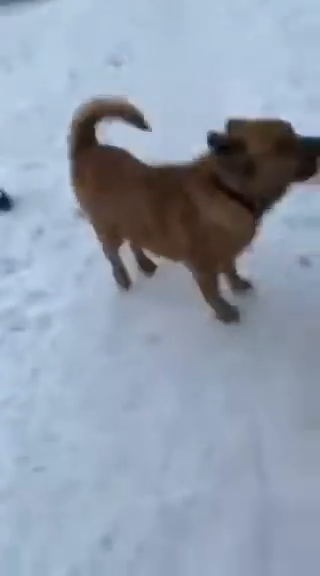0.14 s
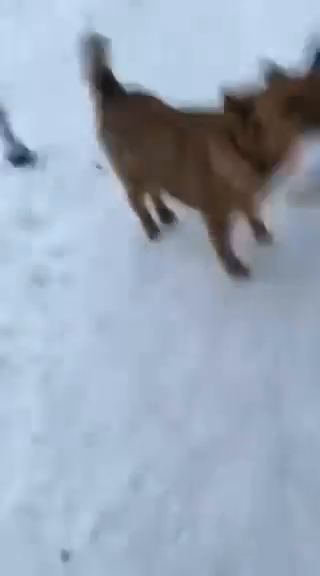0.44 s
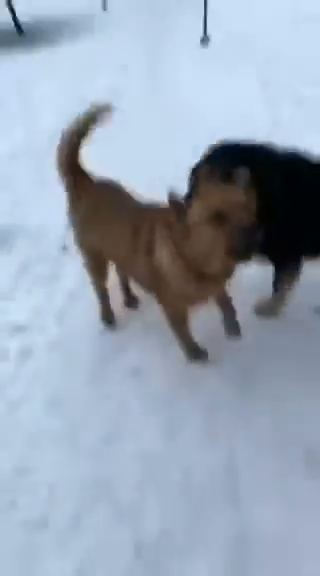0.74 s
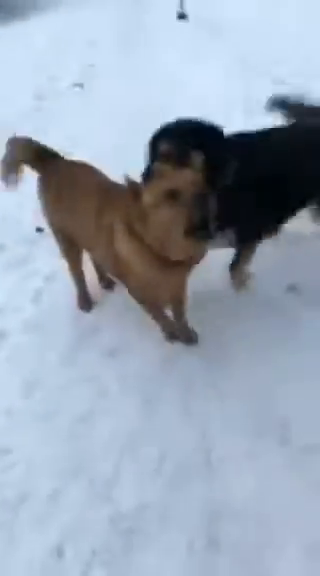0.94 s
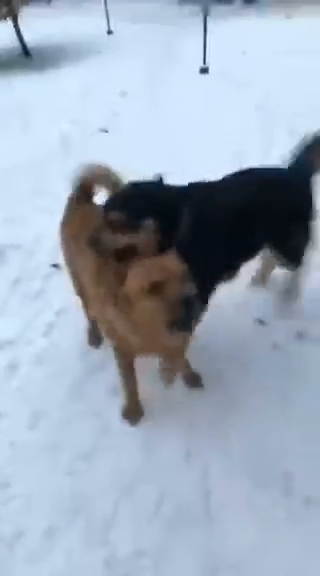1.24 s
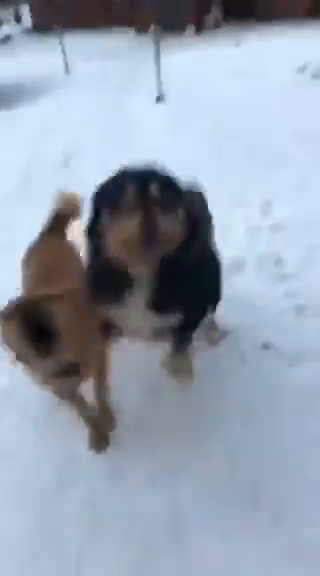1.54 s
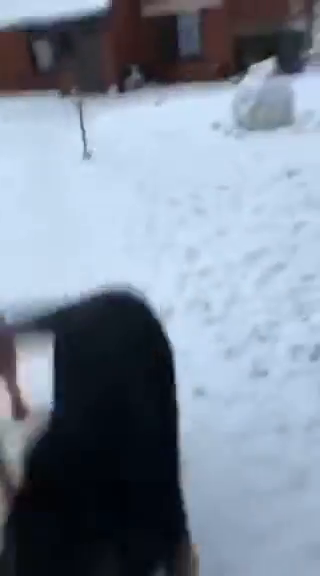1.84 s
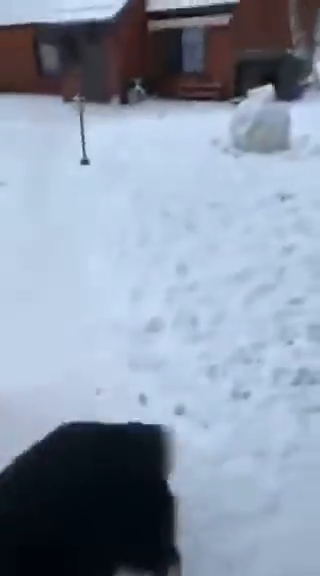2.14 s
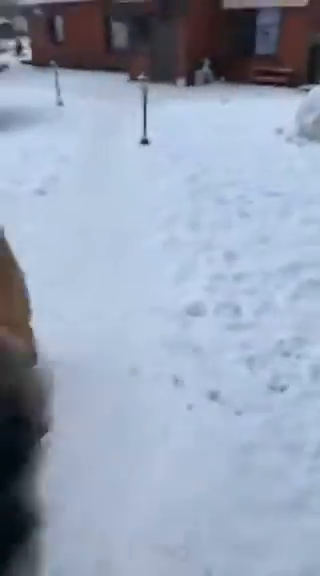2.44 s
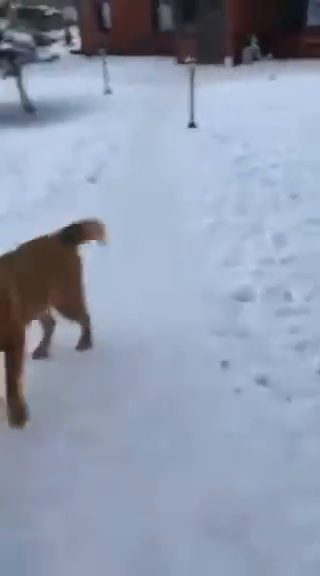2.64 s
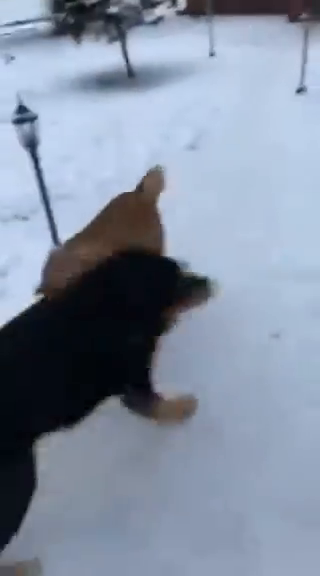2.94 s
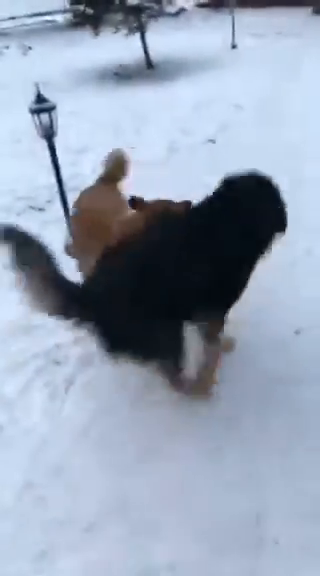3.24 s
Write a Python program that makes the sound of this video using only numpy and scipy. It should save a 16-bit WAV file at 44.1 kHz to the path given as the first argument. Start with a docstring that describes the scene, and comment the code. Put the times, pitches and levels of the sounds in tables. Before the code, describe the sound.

Quick gruff barks and growls from two dogs tussling in the snow.

```python
"""Two dogs play-fight on snow: nine gruff barks, with low growls and lone throat pulses between them.
Each bark is a source and a filter: uneven vocal-fold pulses and fluttering air excite the resonances
of the throat, and those of the mouth add rasp and hiss. Teeth snap, paws scuff the snow and low thumps
reach the nearby microphone. The yard echoes faintly and a limiter holds the peaks."""
import sys
import numpy as np
from scipy import signal
from scipy.fft import rfft, irfft, next_fast_len
from scipy.io import wavfile
from scipy.ndimage import uniform_filter1d, minimum_filter1d, map_coordinates

SR = 44100
rng = np.random.default_rng(int(sys.argv[2]) if len(sys.argv) > 2 else 0)


def put_to_file(sound):
    """Save the sound as 16-bit audio at rate SR, in the file named by the first command-line argument."""
    columns = np.atleast_2d(sound).T  # one column per channel
    safe = np.clip(columns, -1, 1)
    whole_steps = np.round(safe * 32767)
    wavfile.write(sys.argv[1], SR, whole_steps.astype(np.int16))


N = 149940

# Barks. Each row: start, length, attack and release in seconds, level in dB, top pitch in Hz, its place
# from 0 to 1, pitch curvature, clear tone at start and end in dB, jaw resonance in Hz and dB, tongue
# resonance in Hz and dB, valley in Hz, mouth size factor, rasp and hiss in dB.
BARK_CALLS = [ (0.12, 0.1626, 0.024, 0.041, -10.5, 273.8, 0.49, 0.6, -6.5, -0.5, 707, 4.5, 1270, 8, 1560, 0.87, -30, -27),
              (0.8, .172, 0.019, 0.032, -11.5, 292, 0.57, 1.35, -1.5, -1, 830, -5, 1120, 2, 1540, 0.975, -23, -22.5),
              (1.351, 0.2, 0.017, 0.092, -12, 300.6, .31, .85, 11, -14, 863, 9, 1358, 17, 1660, 0.967, -20.5, -20.5),
              (1.545, .172, 0.057, 0.029, -15, 306.2, 0.4, 1, -9, -2, 873, 5, 1370, 9, 1730, 0.893, -19.5, -28),
              (1.792, 0.16, 0.039, 0.024, -16, 274.1, 0.58, .6, -9, -7.5, 845, 5, 1540, 9, 1900, 0.93, -21, -32),
              (2.321, 0.15, 0.036, 0.068, -11, 275.3, 0.36, 0.47, 0, -10.5, 863, 4.5, 1080, 1, 1630, 0.95, -26, -32.5),
              (2.549, 0.1052, 0.027, 0.033, -15, 217.4, 0.6, 0.647, -9, -8.5, 1007, 4.5, 1220, 1, 1750, 1.2, -36.5, -27),
              (2.702, .144, 0.067, 0.044, -12.5, 289.7, 0.65, .9, -2.5, -3.5, 858, 7, 1160, 8, 1880, 0.92, -26, -37.5),
              (2.943, 0.13, 0.029, 0.047, -18.5, 278.1, 0.54, .4, -6, -9.5, 830, 20.5, 1110, 13, 1960, 1.1, -23.5, -32.5)]
# Growls. Each row: start, length, attack and release in seconds, level in dB, top pitch in Hz, clear
# tone and jaw resonance in dB, mouth size factor, rasp and hiss in dB.
GROWL_CALLS = [ (0.266, 0.12, 0.011, 0.041, -35, 195, -12, -2, 0.89, -18.5, -22.5),
               (0.384, 0.15, 0.05, 0.066, -28, 180.3, -4.5, 3.5, 0.81, -27, -26),
               (0.727, 0.093, 0.01, 0.0033, -41, 183.6, 0, 4, 2.1, -3.5, -0.5),
               (0.97, .145, 0.0037, 0.021, -43, 198.7, -19, -9, 0.94, 0.5, -6),
               (1.183, 0.16, 0.18, 0.044, -26, 305.4, 0, 9, 0.925, -5, -11),
               (2.263, 0.19, 0.036, 0.017, -52.5, 200.6, -21.5, 13, 1.1, 11.5, -1),
               (2.465, 0.12, 0.005, 0.031, -31.5, 268.1, -12, -16.5, 1.19, -12, -21),
               (2.643, 0.1, 0.0036, 0.063, -29, 187, 13, -17, 0.59, -31.5, -53),
               (2.823, 0.15, 0.0102, 0.039, -31, 207.6, -3, 4, 1.223, -13, -24.5),
               (3.071, 0.11, 0.022, 0.069, -52, 202.6, -23, 24, 1.3, 8, 1)]
# Catches (-) and pushes (+) of the throat. Each row: time in seconds, gain in dB.
THROAT_JOLTS = [(0.185, -3), (0.203, -9), (.228, -8.5), (0.854, -1), (0.876, -4), (0.887, 1), (1.384, 6.5),
                (1.421, -6.5), (1.447, -2.5), (1.618, 2), (1.667, 10), (1.839, 8), (1.922, 3), (3.02, -6)]
# The clear tone of the voice. Each row: harmonic number, level in dB.
CLEAR_HARMONICS = [(1, -8), (2, -0.5), (3, -20), (4, -27.5), (5, -30)]
# Resonances of a mouth of size 1. Each row: centre and bandwidth in Hz, gain in dB.
RASP_FORMANTS = [(1413, 500, 9), (2105, 560, 7.5), (2804, 440, -2)]
HISS_FORMANTS = [(3270, 440, 1.5), (4080, 740, 8), (5830, 2000, -3.5), (7040, 1100, -12)]
# Air through the teeth. Each row: start in seconds, centre in Hz, level in dB.
AIR_SPURTS = [(.183, 2100, -35.5), (.811, 4450, -29.5), (.831, 3650, -27.5), (0.904, 2280, -35),
              (.95, 2300, -34), (1.364, 2810, -29.5), (1.467, 4060, -35), (1.65, 2280, -39)]
# Brief ringing of the jaw resonance that opens two barks. Each row: start and length in seconds, pitch in Hz,
# level in dB.
OPENING_YELPS = [(0.812, 0.023, 849, -15), (1.36, 0.028, 957, -13.5)]
# Modes of the throat. Each row: frequency in Hz, level in dB, time to decay 60 dB in seconds.
THROAT_MODES = [(371, 5, 0.053), (520, -1, .035), (955, -7, 0.045)]
# Impulsive sounds. Each row: start in seconds, relative level in dB.
TOOTH_SNAPS = [(.319, -31.5), (.483, -42), (.684, -33.5), (1.965, -21.5), (1.972, -30), (1.990, -24)]
LONE_PULSES = [(.643, -29), (.686, -24.5), (.731, -26.5), (1.149, -32.5), (1.197, -29.5), (2.109, -37.5),
               (2.156, -34), (2.204, -28), (2.255, -36), (2.537, -17.5)]
# Contacts. Each row: start, length, attack and release in seconds, level in dB.
DULL_THUMPS = [(.128, 0.055, 0.014, 0.022, -32), (.27, 0.12, 0.02, 0.12, -32.5), (.62, 0.2, .07, 0.14, -31),
               (1.19, 0.16, .035, 0.029, -36.5), (1.965, 0.12, 0.0093, 0.093, -30.5),
               (2.26, 0.32, 0.032, 0.26, -42.5), (2.85, 0.14, 0.015, 0.031, -38)]
PAW_SCUFFS = [(.34, 0.26, 0.095, 0.11, -44), (.60, 0.48, 0.032, 0.09, -43.5),
              (1.19, 0.18, 0.2, 0.02, -44.5), (1.66, 0.32, 0.036, 0.14, -49),
              (2.49, 0.16, 0.013, 0.052, -47.5), (3.20, 0.17, 0.046, 0.036, -41.5)]
# Spectral envelopes. Each row: frequency in Hz, relative level in dB.
AIR_SPECTRUM = [(76, -20.5), (130, 1), (547, -3), (1300, -12), (1670, -10.5), (2950, -21), (4930, -22),
                (8240, -28.5), (9000, -38.5)]
THROAT_SPECTRUM = [(60, -47.5), (150, -22), (230, -7.5), (320, 2), (400, 1), (540, 4.5), (680, 0),
                   (850, -11), (1100, -15), (1450, -32.5), (1800, -38.5), (3500, -78)]
THUMP_SPECTRUM = [(20, -18), (40, 2.5), (80, 4.5), (130, -1.5), (250, -25.5), (800, -47.5)]
SNAP_SPECTRUM = [(300, -25), (1100, 8.5), (1900, 14), (2900, 10.5), (4200, -1.5), (8000, -6.5)]
SNOW_SPECTRUM = [(300, -9.5), (1000, -2.5), (2000, -1), (3200, -5.5), (4500, 1.5), (5800, -5.5),
                 (8500, -20)]
ECHO_SPECTRUM = [(200, -5.5), (1200, 6.5), (4000, 5.5), (9000, -19.0)]
# Reach of the lips' spectral ripple. Each row: frequency in Hz, share of the full depth.
RIPPLE_SHARES = [(550, 0.018), (1000, 1)]

JITTER_CYCLES, PITCH_DRIFT, SHIMMER_DB = .11, .02, 5  # irregularity of the vocal folds
AIR_SHARE = .42  # of the source power
FLAP_HZ, FLAP_DEPTH = 37.5, 0.07  # rattle of lips and cheeks
PEAK_WIDTH_HZ, VALLEY_WIDTH_HZ, VALLEY_DB = 74, 84, 5  # jaw and tongue peaks, and the gap above them


def amp(db):
    """Amplitude ratio of a level in decibels."""
    return 10 ** (np.asarray(db) / 20)


def unit(x):
    """Normalisation to an rms of 1."""
    return x / np.sqrt(np.mean(x ** 2) + 1e-20)


def along(points, hz):
    """Interpolation of (Hz, value) points on a logarithmic frequency axis."""
    freqs, values = np.transpose(points)
    return np.interp(np.log(hz + 1), np.log(freqs + 1), values)


def bell(x, centre, width):
    """A Gaussian of height 1."""
    return np.exp(-((x - centre) / width) ** 2 / 2)


def wobble(rate, n):
    """Smooth random modulation with rate knots a second."""
    return map_coordinates(rng.standard_normal(2048), [np.arange(n) * rate / SR], mode="wrap")


def coloured(x, gain):
    """Minimum-phase filtering by gain(hz): folding the cepstrum makes the response causal."""
    size = 2 * next_fast_len(len(x))
    hz = np.fft.rfftfreq(size, 1 / SR)
    cepstrum = irfft(np.log(np.maximum(gain(hz), 1e-6)))
    cepstrum[1:size // 2] *= 2
    cepstrum[size // 2 + 1:] = 0
    return irfft(rfft(x, size) * np.exp(rfft(cepstrum)))[:len(x)]


def noise(spectrum, n):
    """White noise filtered to a spectrum, at an rms of 1."""
    return unit(coloured(rng.standard_normal(N)[:n], lambda hz: amp(along(spectrum, hz))))


def resonances(formants, hz):
    """Summed gain of steep band-pass resonators in parallel."""
    return sum(amp(db) * (hz * width) ** 2 / ((centre ** 2 - hz ** 2) ** 2 + (hz * width) ** 2)
               for centre, width, db in formants)


def envelope(length, attack, release, rise_db=13.5, fade_db=14.5):
    """Times and a gain with exponential rise and decay; the decay spans two release times."""
    t = np.arange(int((length + release) * SR)) / SR
    rise = np.maximum(1 - t / attack, 0)
    fade = np.maximum((t - length) / release + 1, 0)
    return t, amp(-rise_db * rise - fade_db * fade)


def add(track, start, x):
    """Superposition of x on the track from start seconds."""
    i = max(round(start * SR), 0)
    track[i:i + len(x)] += x[:max(N - i, 0)]


def background(air_db=-46, rumble_db=-47.5):
    """Steady noise of winter air, and a slowly modulated rumble on the microphone."""
    air = amp(air_db) * noise(AIR_SPECTRUM, N)
    return air + amp(rumble_db + 1.5 * wobble(7.7, N)) * noise(THUMP_SPECTRUM, N)


def lips(x, depth_db=10, spacing_hz=172.1, shape_s=0.054):
    """Articulation: lips and tongue impose spectral peaks and valleys that blend from shape to shape."""
    out = np.zeros(len(x))
    place = np.arange(len(x)) / SR / shape_s
    for shape, knots in enumerate(rng.standard_normal((8, 1024))):
        weight = np.maximum(1 - np.abs(place - shape), 0)
        if weight.any():
            ripple = lambda hz: np.tanh(2 * map_coordinates(knots, [hz / spacing_hz]))
            out += weight * coloured(x, lambda hz: amp(depth_db * ripple(hz) * along(RIPPLE_SHARES, hz)))
    return out


def fold_pulses(cycles):
    """Phonation: the vocal folds give one pulse a cycle, uneven in time (jitter) and size (shimmer)."""
    n = len(cycles)
    jitter, shimmer = rng.standard_normal((128, 2))[:int(cycles[-1])].T
    closures = np.interp(np.arange(len(jitter)) + JITTER_CYCLES * jitter, cycles, np.arange(n))
    return unit(np.bincount(closures.astype(int), amp(SHIMMER_DB * shimmer), n))


def call(length, attack, release, db, top_hz, top_at, arch, clear_db, clear_end_db,
         jaw_hz, jaw_db, tongue_hz, tongue_db, valley_hz, mouth, rasp_db, hiss_db):
    """Source-filter voice: pulses and pulsing air excite throat and mouth, beside a harmonic tone."""
    t, env = envelope(length, attack, release)
    n, progress = len(t), np.minimum(t / length, 1)
    pitch = top_hz * np.exp(-arch * (progress - top_at) ** 2 + PITCH_DRIFT * wobble(90, n))
    cycles = np.cumsum(pitch) / SR
    pulses = fold_pulses(cycles)
    flap = 1 + FLAP_DEPTH * np.sin(2 * np.pi * FLAP_HZ * t + wobble(28.9, n))
    air = unit(rng.standard_normal(SR)[:n] * np.exp(0.5 * np.cos(2 * np.pi * cycles)))
    source = lips(flap * (np.sqrt(1 - AIR_SHARE) * pulses + np.sqrt(AIR_SHARE) * air))
    source = coloured(source, lambda hz: amp(-VALLEY_DB * bell(hz, valley_hz, VALLEY_WIDTH_HZ)))
    peaks_db = lambda hz: (jaw_db * bell(hz, jaw_hz, PEAK_WIDTH_HZ)
                           + tongue_db * bell(hz, tongue_hz, PEAK_WIDTH_HZ))
    throat = unit(coloured(source, lambda hz: amp(along(THROAT_SPECTRUM, hz) + peaks_db(hz))))
    tone = unit(flap * sum(amp(level + peaks_db(k * pitch)) * np.sin(2 * np.pi * k * cycles)
                           for k, level in CLEAR_HARMONICS))
    clear = amp(clear_db + (clear_end_db - clear_db) * progress)
    voice = (throat + clear * tone) / np.hypot(1, clear)  # equal-power mix
    rasp = coloured(source, lambda hz: resonances(RASP_FORMANTS, hz * mouth))  # larger is lower
    rasp = unit(rasp * amp(1.2 * wobble(67.4, n)))
    breath = lips(flap * air * amp(2.6 * wobble(47.8, n)))
    hiss = unit(coloured(breath, lambda hz: resonances(HISS_FORMANTS, hz * mouth)))
    return amp(db) * env * (voice + amp(rasp_db) * rasp + amp(hiss_db) * hiss)


def dogs():
    """Barks, growls and yelps, amplitude-modulated by jolts of the throat, plus spurts of air."""
    out = np.zeros(N)
    for start, *row in BARK_CALLS:
        add(out, start, call(*row))
    for start, *row in GROWL_CALLS:
        add(out, start, growl(*row))
    for start, *row in OPENING_YELPS:
        add(out, start, yelp(*row))
    t = np.arange(N) / SR
    out *= amp(sum(db * bell(t, time, width=.0033) for time, db in THROAT_JOLTS))
    for start, *row in AIR_SPURTS:
        add(out, start, spurt(*row))
    return out


def yard_echo(x, t60=0.38, db=-22):
    """Reverberation: reflections from trees and house merge into a dull, exponentially decaying tail."""
    t = np.arange(SR // 2) / SR
    tail = noise(ECHO_SPECTRUM, len(t)) * amp(-60 * t / t60)
    return amp(db) * signal.fftconvolve(x, tail / np.linalg.norm(tail))[:N]


def contact_noise(contacts, spectrum, grain_db):
    """Noise that swells with each contact; fast random modulation makes it grainy."""
    out = np.zeros(N)
    for start, length, attack, release, db in contacts:
        t, env = envelope(length, attack, release)
        grains = noise(spectrum, len(t)) * amp(grain_db * wobble(600, len(t)))
        add(out, start, amp(db) * env * unit(grains))
    return out


def thumps():
    """Soft impacts of steps and handling reach the microphone as low-frequency noise."""
    return contact_noise(DULL_THUMPS, THUMP_SPECTRUM, grain_db=5.5)


def spurt(centre_hz, db, length=.022, width_share=0.2):
    """Turbulent air through the teeth excites one resonance: a short, ragged whistle."""
    t, env = envelope(length, length / 3, length / 3)
    air = rng.standard_normal(len(t)) * amp(3.6 * wobble(600, len(t)))
    whistle = coloured(air, lambda hz: resonances([(centre_hz, centre_hz * width_share, 0)], hz))
    return amp(db) * env * unit(whistle)


def growl(length, attack, release, db, top_hz, clear_db, jaw_db, mouth, rasp_db, hiss_db):
    """Quiet phonation through the same filter as a bark, without the tongue resonance."""
    return call(length, attack, release, db, top_hz, top_at=.56, arch=.55,
                clear_db=clear_db, clear_end_db=clear_db, jaw_hz=920, jaw_db=jaw_db, tongue_hz=0,
                tongue_db=0, valley_hz=1584, mouth=mouth, rasp_db=rasp_db, hiss_db=hiss_db)


def tooth_snaps(t60=0.019):
    """Hard impacts of teeth give broadband, heavily damped bursts."""
    out, t = np.zeros(N), np.arange(SR // 10) / SR
    for start, db in TOOTH_SNAPS:
        burst = rng.standard_normal(len(t)) * amp(-60 * t / t60)
        click = coloured(burst, lambda hz: amp(along(SNAP_SPECTRUM, hz)))
        add(out, start, 2 * amp(db) * click / np.abs(click).max())
    return out


def paw_scuffs():
    """Friction of paws sliding on snow gives broadband noise."""
    return contact_noise(PAW_SCUFFS, SNOW_SPECTRUM, grain_db=2.5)


def grunts(attack_s=0.0007, detune=0.051):
    """Impulse response: each lone vocal-fold pulse rings the throat's damped modes, slightly detuned."""
    out, t = np.zeros(N), np.arange(SR // 10) / SR
    for start, db in LONE_PULSES:
        stretches = np.exp(detune * rng.standard_normal(len(THROAT_MODES)))
        ring = sum(amp(level - 60 * t / t60) * np.sin(2 * np.pi * hz * stretch * t)
                   for (hz, level, t60), stretch in zip(THROAT_MODES, stretches))
        add(out, start, amp(db) * ring * (1 - np.exp(-t / attack_s)))
    return out


def yelp(length, hz, db, rise=0.13, waver=0.016):
    """The jaw resonance rings briefly as a bark opens: a pure tone, frequency-modulated so that it rises and
    wavers."""
    t, env = envelope(length, length / 3, length / 3)
    pitch = hz * (1 + rise * (t / length - .5) + waver * wobble(520, len(t)))
    return amp(db) * env * unit(np.sin(2 * np.pi * np.cumsum(pitch) / SR))


def scene():
    """Superposition of the direct sound, its echo and the noise at the microphone."""
    direct = dogs() + grunts() + tooth_snaps() + paw_scuffs()
    return (direct + yard_echo(direct) + thumps() + background())[None]


def record(dry, ceiling=0.66, hold_s=0.0025, top_hz=9200):
    """Peak limiting by a briefly held, smoothed gain, then a sharp low-pass filter."""
    hold = int(hold_s * SR)
    needed_gain = ceiling / np.maximum(np.abs(dry), ceiling)
    gain = uniform_filter1d(minimum_filter1d(needed_gain, hold), hold)
    size = next_fast_len(N + SR // 2)
    passband = np.fft.rfftfreq(size, 1 / SR) < top_hz
    return irfft(rfft(dry * gain, size) * passband, size)[:, :N]


dry = scene()
out = record(dry)
put_to_file(out)
```